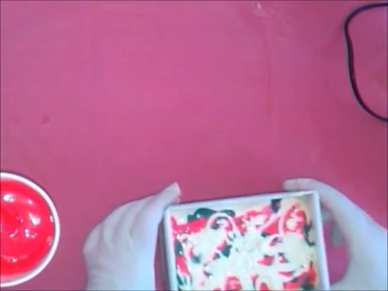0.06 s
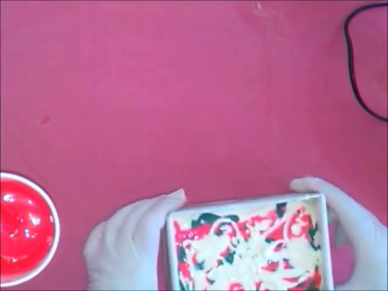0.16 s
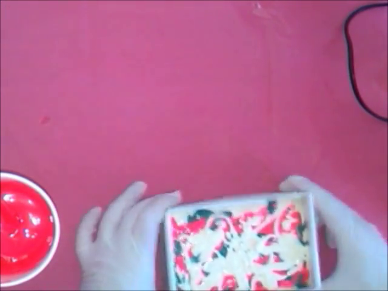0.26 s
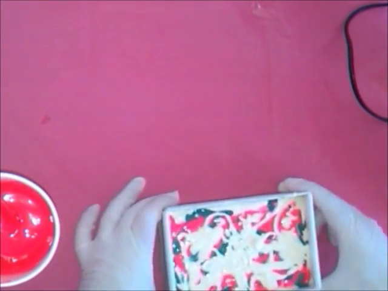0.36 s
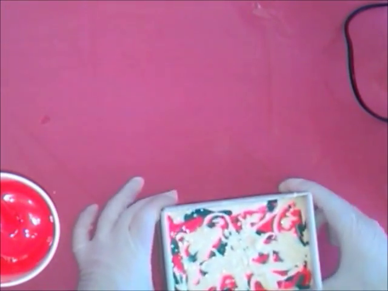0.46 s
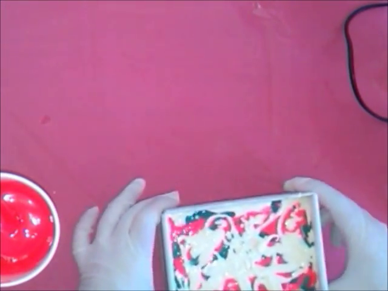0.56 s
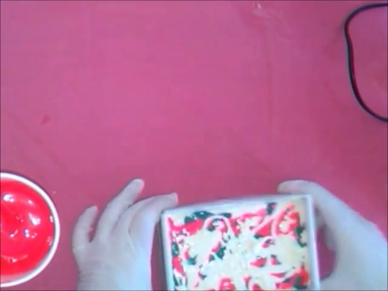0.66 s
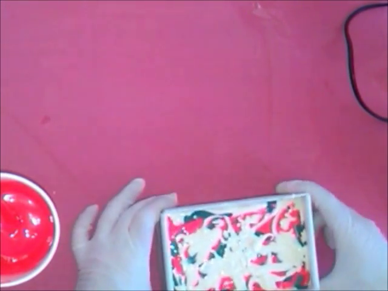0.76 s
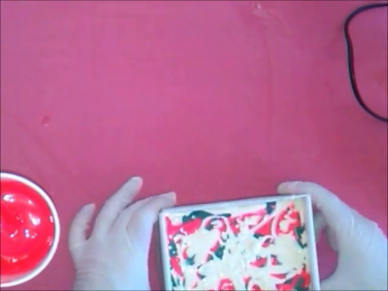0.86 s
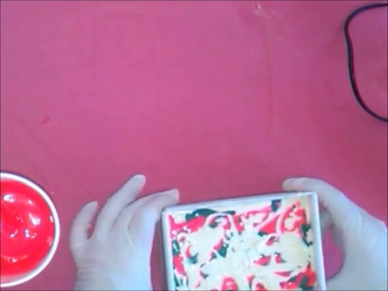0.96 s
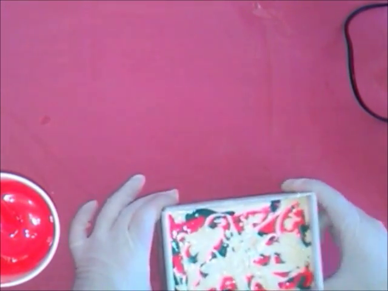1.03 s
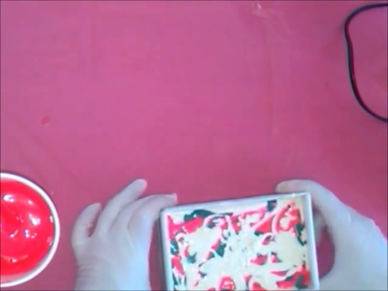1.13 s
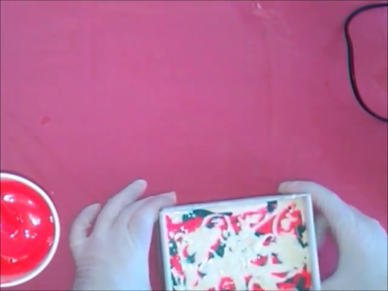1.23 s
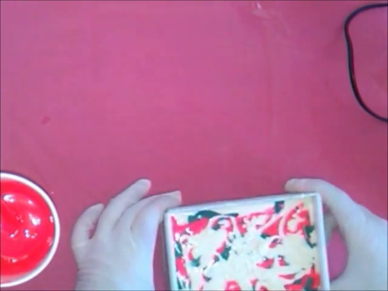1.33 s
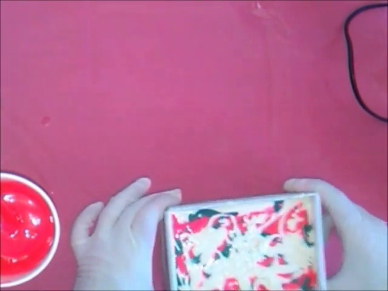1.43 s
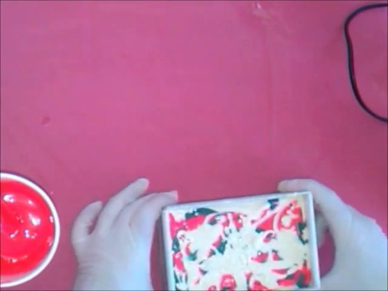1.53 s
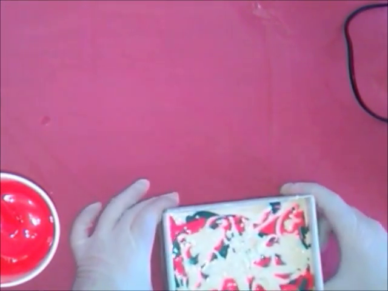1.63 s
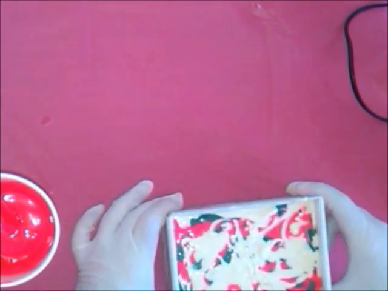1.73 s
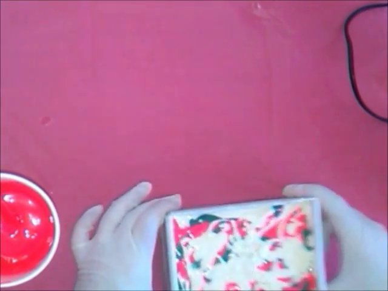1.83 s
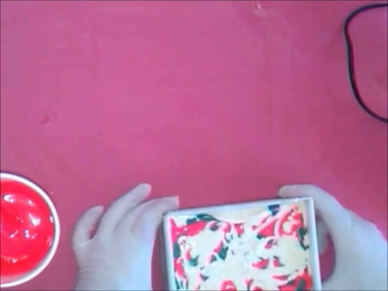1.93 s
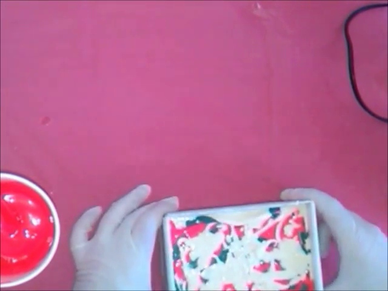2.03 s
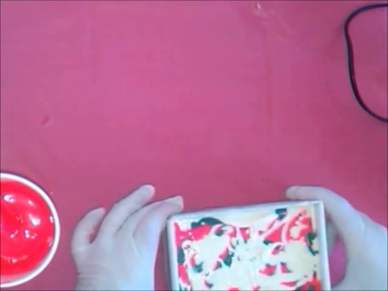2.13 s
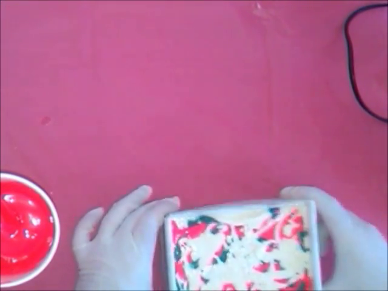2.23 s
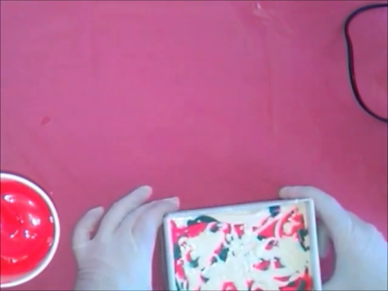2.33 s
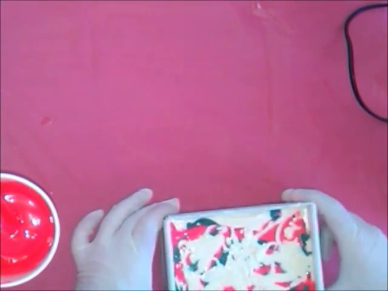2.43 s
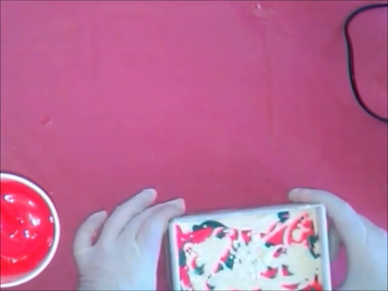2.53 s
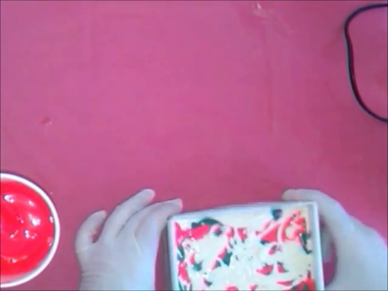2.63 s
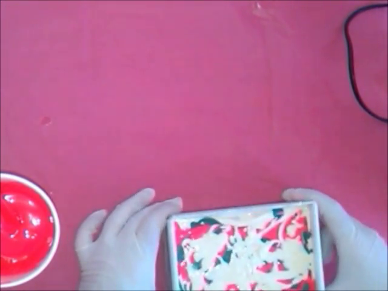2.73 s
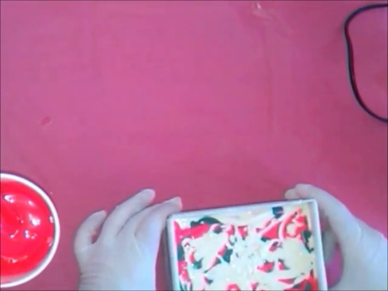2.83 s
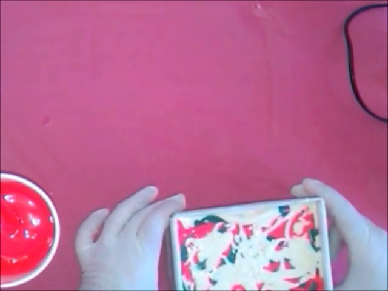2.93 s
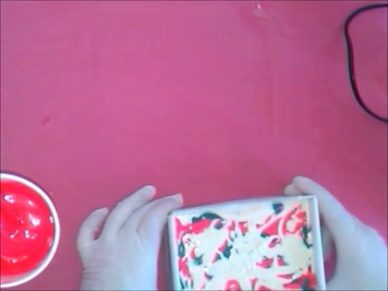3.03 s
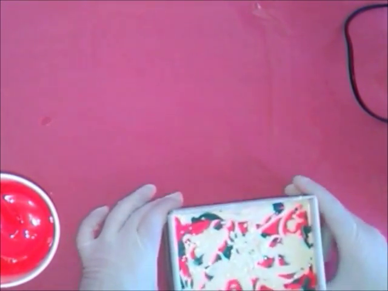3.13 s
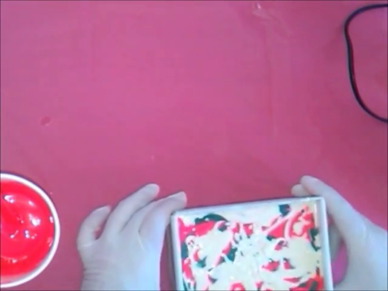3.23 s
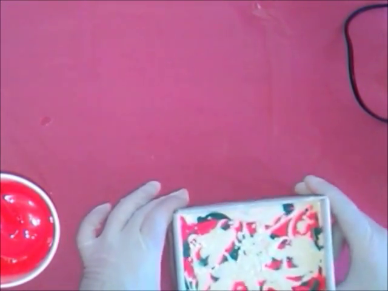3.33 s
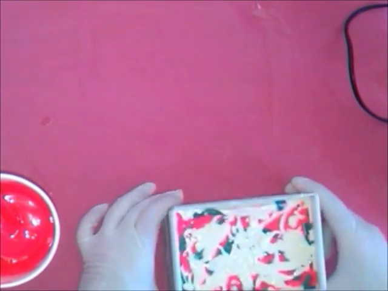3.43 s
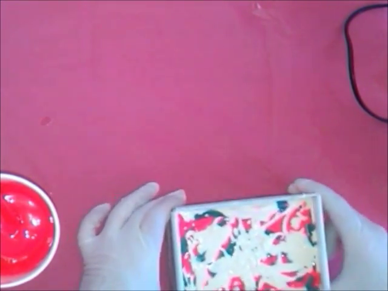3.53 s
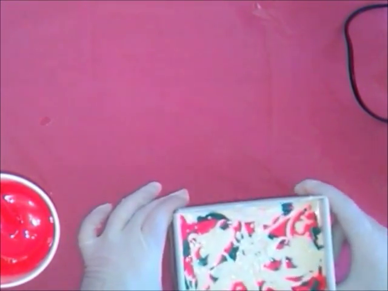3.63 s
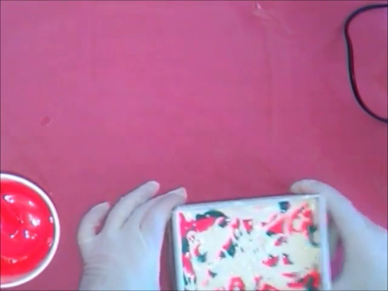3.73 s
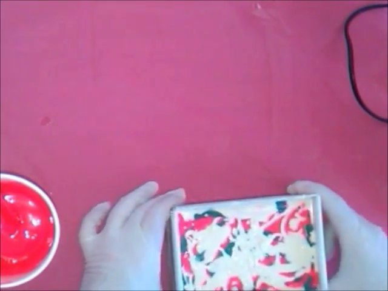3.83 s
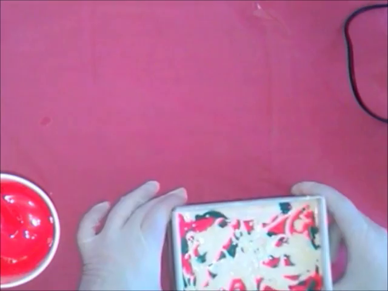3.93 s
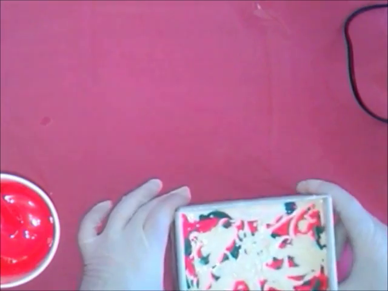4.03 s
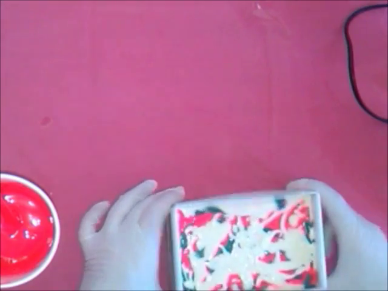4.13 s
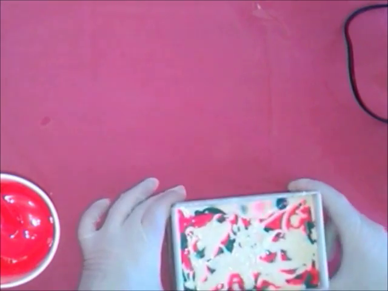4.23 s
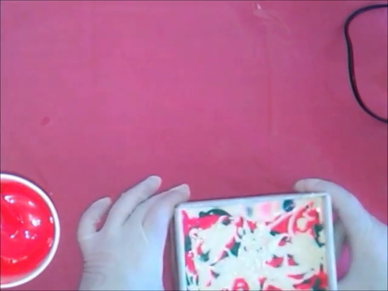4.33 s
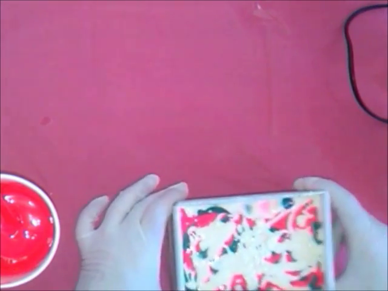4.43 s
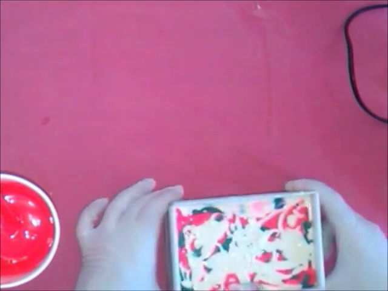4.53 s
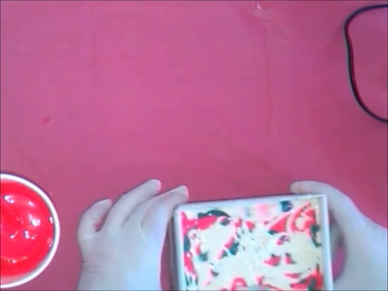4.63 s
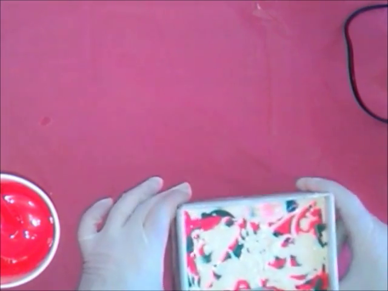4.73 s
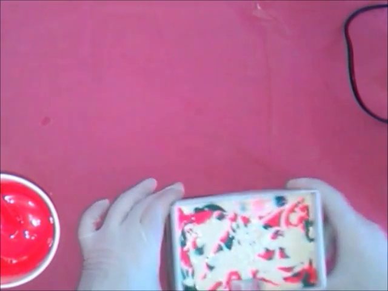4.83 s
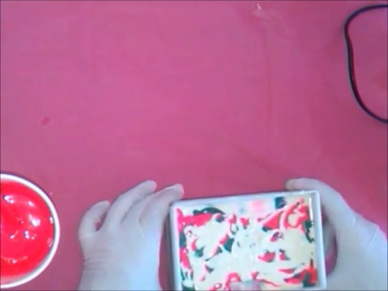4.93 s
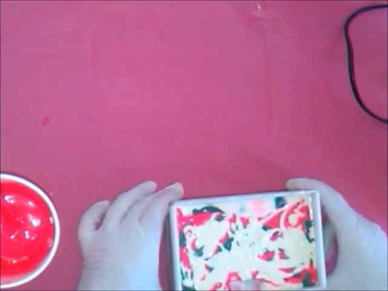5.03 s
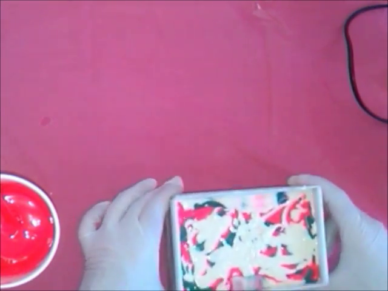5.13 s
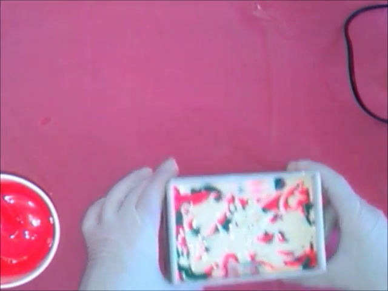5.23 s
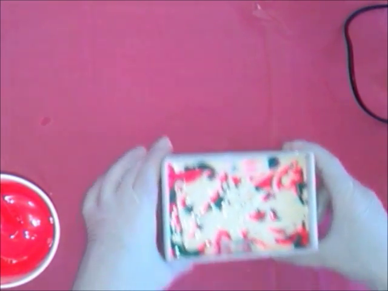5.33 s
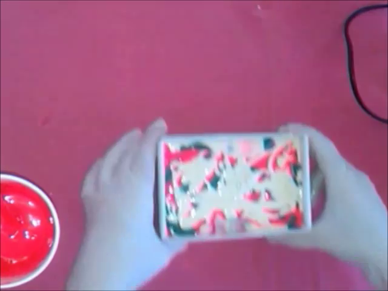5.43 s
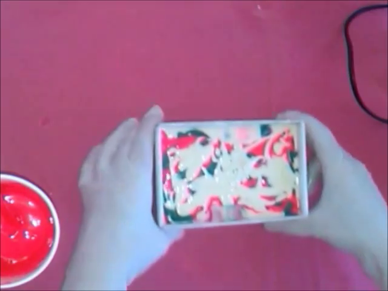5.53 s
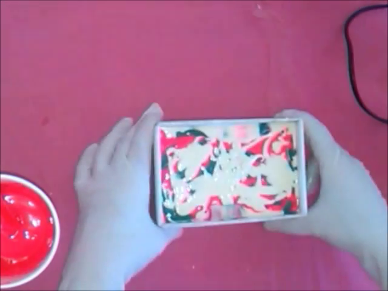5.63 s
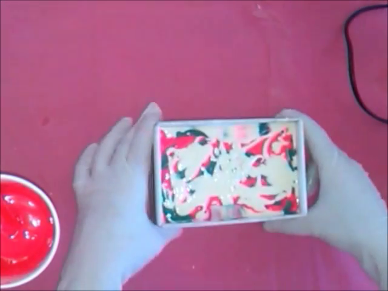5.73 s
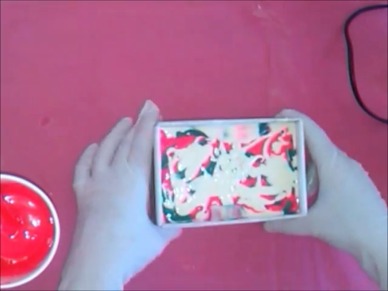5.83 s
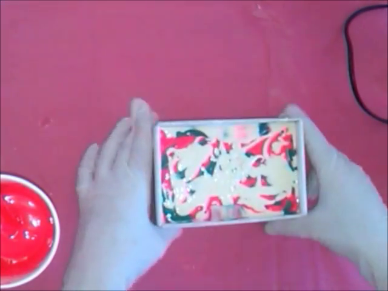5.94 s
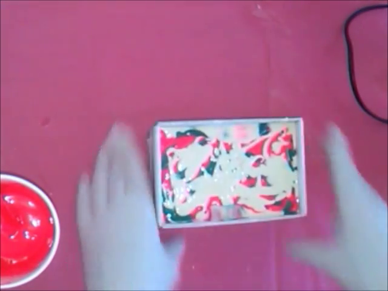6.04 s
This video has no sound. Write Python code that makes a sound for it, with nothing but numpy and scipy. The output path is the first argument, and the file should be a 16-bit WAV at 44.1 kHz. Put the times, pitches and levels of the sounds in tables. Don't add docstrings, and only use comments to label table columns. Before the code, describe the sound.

A close, cheap microphone picks up a filled mould rapped firmly against a table at a regular pace, slightly quickening. Thirteen loud blows mix a sharp clack with a dull knock and short deep thud, each followed by a brief bright room echo. After the last one at five seconds, only soft hiss and hum remain, with a few small contacts as it is put down.

```python
import sys
import numpy as np
from scipy import signal
from scipy.fft import rfft, irfft
from scipy.io import wavfile
from scipy.ndimage import uniform_filter1d

SR = 44100
rng = np.random.default_rng(int(sys.argv[2]) if len(sys.argv) > 2 else 0)


def materialize(psi):
    bounded = np.clip(np.atleast_2d(psi).T, -1, 1)
    quanta = np.round(bounded * 32767).astype(np.int16)
    wavfile.write(sys.argv[1], SR, quanta)


def decibels_to_gain(level_db):
    exponent = np.asarray(level_db, float) / 20
    return 10 ** exponent


N = 268128
TAIL = 2 ** 15

# frequency in Hz, density in dB per Hz.
FLOOR_COLOUR = [(18, -65.5), (30, -32.5), (86, -7), (122, -6.5), (142, -1), (217, -9.5), (248, -4),
                (314, -21), (378, -14.5), (409, -20), (858, -23), (4530, -35), (7090, -34), (15200, -43.5),
                (16500, -41.5)]
# centre in Hz, width in Hz, level in dB.
HUM = [
    (228.9, 10, -78),
    (182, 30, -75.5),
    (7900, 1400, -83.5),
]
# frequency in Hz, T60 in seconds.
ROOM_T60 = [(250, 0.36), (600, 0.28), (1500, 0.25), (3500, 0.27), (8000, 0.24), (13000, 0.21)]
# delay in seconds, level over the wash in dB.
ECHOES = [(.0003, 4.5), (.0022, -6), (.0053, 7.5), (0.009, 0), (.024, -7.5)]
# start in seconds, swing in dB, knock in dB, knock in Hz, clack in dB.
BLOWS = [(.4235, -29.5, -31.5, 635, 4.4), (0.8273, -28, -25.5, 610, 1), (1.2212, -31.5, -29.5, 519, 3.5),
         (1.623, -28.5, -23.5, 600, -3.5), (2.0106, -29.5, -25, 640, 4), (2.3905, -27.5, -22.5, 681, -3),
         (2.7829, -29, -26.5, 580, 6), (3.1791, -30.5, -26, 501, 0.7), (3.5479, -28.5, -28, 640, 0.3),
         (3.9036, -30.5, -27, 400, 4), (4.2710, -28, -26, 615, 3.6), (4.63, -29, -26, 1050, 2.5),
         (4.9837, -29.5, -29.5, 800, 6.5)]
# start in seconds, level in dB, knock in Hz, boom in dB.
TAPS = [
    (.066, -65, 500, 17),
    (.4178, -35, 684, 5.5),
    (.782, -82, 706, 2.1),
    (2.3865, -36, 705, 5),
    (3.1732, -42.5, 1200, 8.5),
    (3.8993, -56.5, 803, 2),
    (4.6293, -23, 1470, -2),
    (4.979, -36.5, 890, 0.5),
    (5.705, -54, 499, 8),
]
# frequency in Hz, density in dB per Hz.
KNOCK_COLOUR = [(150, -40), (300, -1), (440, -6), (640, -1.84), (850, -6), (1700, -10.5), (2600, -16),
                (5000, -32.5)]
# start in seconds, level in dB, wall ring in Hz, wall ring in dB,
# extra first crack in dB when it lands flat.
SLAPS = [(0.424, -19, 4440, 3, 0), (0.8287, -18.5, 4830, 1.6, 3.5), (1.222, -16.5, 4820, -1.3, 1),
         (1.6231, -16.5, 4270, 8, -4.5), (2.0104, -15, 4830, -1.5, -2), (2.3908, -17, 3890, 4.5, .1),
         (2.7833, -15.5, 4500, 0, -2), (3.1809, -20, 4460, 0.1, 3), (3.5479, -16, 3450, 5, -7),
         (3.9052, -18, 3250, 5.5, 6.5), (4.2709, -16.5, 4530, 12, -4.5), (4.6307, -19, 3050, 7, 4),
         (4.9849, -19.5, 3490, 3, 2.5)]
# start in seconds, level in dB, wall ring in Hz, wall ring in dB.
TOUCHES = [(.066, -58, 4800, -1), (0.091, -59, 4000, -10), (.812, -57, 4000, -26), (1.578, -67.5, 3370, -1),
           (3.092, -70, 4050, 5), (3.177, -31, 2960, 5), (3.9041, -27, 3000, -8), (4.250, -57, 3000, -10),
           (4.6298, -20, 4160, -19.5), (4.980, -33, 3530, -7), (5.460, -69, 3580, 8),
           (5.681, -58.5, 3950, -5), (5.705, -51.5, 3800, 10), (5.716, -49, 5500, 6),
           (5.729, -49.5, 4700, -1.5), (6.040, -69, 4000, -9)]
# frequency in Hz, density in dB per Hz.
SLAP_COLOUR = [(1200, -42), (2600, -17), (3980, -11.5), (6430, -11), (7300, -7.5), (8030, -4.5),
               (9000, -9.5), (10200, -15.5), (12000, -19.5), (15300, -22.5), (17000, -35.5)]
# start in seconds, frequency in Hz, level in dB, T60 in seconds.
DABS = [
    (.066, 382, -59, 0.14),
    (4.628, 1430, -7, 0.0024),
    (4.632, 1546, -24, 0.037),
    (5.699, 353, -48.5, 0.052),
    (5.726, 170.6, -52, 0.099),
]
# start in seconds, swing in dB.
SET_DOWNS = [
    (5.6995, -54.5),
    (5.7225, -55.5),
    (0.087, -64),
]
# frequency in Hz, level against the swing in dB, T60 in seconds,
# direction with (1) or against (-1) the blow.
RINGS = [(221, -3.5, .14, 1), (225.7, -11.1, .3, -1), (245.9, -7.7, .17, 1), (253.7, -18.9, .38, -1),
         (287.9, -1.7, .19, -1), (290, 5.7, .09, 1), (385.9, -7.9, .12, -1), (622, -19, .28, 1)]
# frequency in Hz, level against the swing in dB,
# T60 in seconds, direction with (1) or against (-1) the blow.
FRAME = [(59.1, -31, 1.6, 1), (62.8, -29, 2, 1), (73.9, -15.4, .55, 1), (91.1, -1, .23, 1),
         (144.7, -9, .41, 1), (150.9, -13, .4, 1), (164.8, -11, .37, -1), (167.8, -22, .7, 1)]


def on_log(points, hz):
    p = np.array(points, float)
    return np.interp(np.log(np.maximum(hz, 1)), np.log(p[:, 0]), p[:, 1])


def bump(hz, centre_hz, octaves):
    return np.exp(-(np.log2(np.maximum(hz, 1) / centre_hz) / octaves) ** 2)


def causal(db):
    cepstrum = irfft(np.log(decibels_to_gain(db)))
    half = len(cepstrum) // 2
    folded = np.r_[cepstrum[0], 2 * cepstrum[1:half], cepstrum[half], np.zeros(half - 1)]
    return np.exp(rfft(folded))


def add(out, s, x):
    i = int(s * SR)
    out[i:i + len(x)] += x[:N - i]


def unit(x):
    return x / np.sqrt(np.mean(x ** 2))


def sine(hz, t):
    return np.sin(2 * np.pi * hz * t)


def floor():
    hz = np.fft.rfftfreq(N, 1 / SR)
    hiss = irfft(rfft(rng.standard_normal(N)) * decibels_to_gain(on_log(FLOOR_COLOUR, hz)), N)
    out = decibels_to_gain(-65) * unit(hiss)
    for hum_hz, width_hz, db in HUM:
        resonance = 1 / (1 + (2 * (hz - hum_hz) / width_hz) ** 2)
        out = out + decibels_to_gain(db) * unit(irfft(rfft(rng.standard_normal(N)) * resonance, N))
    return out


def room(walls, lead_s, rise_s, crack_db, clump_db, snap_db=0):
    t, hz = np.arange(TAIL) / SR, np.fft.rfftfreq(TAIL, 1 / SR)
    centres, t60 = np.transpose(ROOM_T60)
    bands = np.array([on_log(list(zip(centres, one)), hz) for one in np.eye(len(centres))])
    run_up = decibels_to_gain(-11.0) * np.sqrt(np.minimum(t / lead_s, 1))
    early = run_up + 1 - np.exp(-np.maximum(t - lead_s, 0) / rise_s)
    scatter_db = 1.5 * rng.standard_normal(len(ECHOES))
    scatter_db[0] = snap_db
    for (s, db), chance_db in zip(ECHOES, scatter_db):
        late = np.maximum(t - lead_s - s, 0) / 0.00067
        early = early + decibels_to_gain(db + crack_db + chance_db) * late * np.exp(1 - late)
    wash = 0.48 * walls + 0.71 * rng.standard_normal(TAIL)
    fade_db = -60 * t / t60[:, None]
    fade = decibels_to_gain(fade_db) + decibels_to_gain(-24 + fade_db / 1.85)
    fading_wash = (fade * irfft(bands * rfft(wash))).sum(axis=0)
    clumps = uniform_filter1d(rng.standard_normal(len(hz)), size=90)
    clumps = unit(uniform_filter1d(clumps, size=90))
    return rfft(early * fading_wash) * causal(clump_db * clumps)


def knocks():
    out, hz, walls = np.zeros(N), np.fft.rfftfreq(TAIL, 1 / SR), rng.standard_normal(TAIL)
    lead_s = .003
    # start, level dB, knock Hz, knock ring dB, boom dB, clack dB
    hits = [(s, db, knock_hz, 4, -1.5, clack_db) for s, _, db, knock_hz, clack_db in BLOWS]
    hits = hits + [(s, db, knock_hz, 4.5, boom_db, -0.7) for s, db, knock_hz, boom_db in TAPS]
    for s, db, knock_hz, knock_db, boom_db, clack_db in hits:
        colour = on_log(KNOCK_COLOUR, hz) + knock_db * bump(hz, knock_hz, .28)
        colour = colour + boom_db * bump(hz, 330, 0.1) + clack_db * bump(hz, 1800, 0.55)
        answer = room(walls, lead_s, 0.0085, 0, clump_db=1.55)
        add(out, s - lead_s, decibels_to_gain(db + 7) * irfft(answer * causal(colour)))
    return out


def slaps():
    out, hz, walls = np.zeros(N), np.fft.rfftfreq(TAIL, 1 / SR), rng.standard_normal(TAIL)
    lead_s = .002
    # start, level dB, ring Hz, ring dB, first crack dB, edge dB
    hits = [row + (-3,) for row in SLAPS] + [row + (1.5, -1.2) for row in TOUCHES]
    for s, db, ring_hz, ring_db, snap_db, edge_db in hits:
        overtones = bump(hz, 2 * ring_hz, 0.19) + bump(hz, 3 * ring_hz, .1)
        overtone_db = 0.7 * max(ring_db, -3) * min(ring_hz / 4400, 1) ** 4
        colour = on_log(SLAP_COLOUR, hz) + ring_db * bump(hz, ring_hz, .27)
        colour = colour + overtone_db * overtones + edge_db * bump(hz, 14000, 0.48)
        answer = room(walls, lead_s, 0.0055, -2.8, clump_db=2.04, snap_db=snap_db)
        add(out, s - lead_s, decibels_to_gain(db + 2.5) * irfft(answer * causal(colour)))
    return out


def dabs():
    out, t = np.zeros(N), np.arange(TAIL) / SR
    for s, hz, db, t60 in DABS:
        attack = 1 - np.exp(-t * hz / 0.44)
        add(out, s, decibels_to_gain(db - 60 * t / t60) * attack * sine(hz, t))
    return out


def table():
    out, t = np.zeros(N), np.arange(TAIL) / SR
    free_s, stop_s = .0482, .0122
    free = 1 / (1 + np.exp(np.clip((t - free_s - stop_s) / (stop_s / 2), -50, 50)))
    swing = (1 - np.exp(-t / .007)) * free * sine(70.1, t - .003)
    overtone = (1 - np.exp(-(t / .02) ** 2)) * free * sine(154.4, t - .001)
    late = np.maximum(t - .0021, 0)
    thud = -(late / .0016) ** 2 * np.exp(2 - late / .0017) / 4 * sine(162.7, late)
    hz, db, t60, way = np.transpose(FRAME)[:, :, None]
    frame = (1 - free) * (way * decibels_to_gain(db + 0.4 - 60 * t / t60) * sine(hz, t)).sum(axis=0)
    body = swing + frame + decibels_to_gain(-6.5) * overtone + decibels_to_gain(5.5) * thud
    nudge = decibels_to_gain(-4 - 60 * t / .012) * sine(444, t)
    hz, db, t60, way = np.transpose(RINGS)[:, :, None]
    for s, swing_db in [row[:2] for row in BLOWS] + SET_DOWNS:
        level_chance, pitch_chance = rng.standard_normal((2, len(RINGS), 1))
        ring_level = way * decibels_to_gain(db - 0.06 + 1.2 * level_chance - 60 * t / t60)
        rings = (ring_level * sine(hz * (1 + .002 * pitch_chance), t)).sum(axis=0)
        rings = rings * (1 - np.exp(-t / .004))
        add(out, s - .0022, decibels_to_gain(swing_db) * nudge)
        add(out, s - .0006, decibels_to_gain(swing_db) * (body + rings))
    return out


def scene():
    return (floor() + knocks() + slaps() + dabs() + table())[None]


def roll_off(x):
    return signal.sosfilt(signal.butter(12, 16980, fs=SR, output="sos"), x)


def record(dry):
    x = signal.sosfilt(signal.butter(3, 46, "high", fs=SR, output="sos"), dry)
    hz = np.fft.rfftfreq(N, 1 / SR)
    x = irfft(rfft(x) * decibels_to_gain(-27 * np.clip((hz - 15900) / 150, 0, 1)), N)
    return roll_off(x)


dry = scene()
out = record(dry)
materialize(out)
```